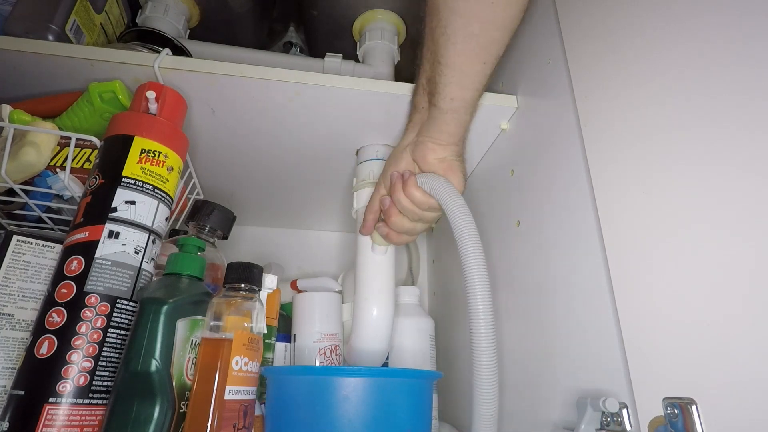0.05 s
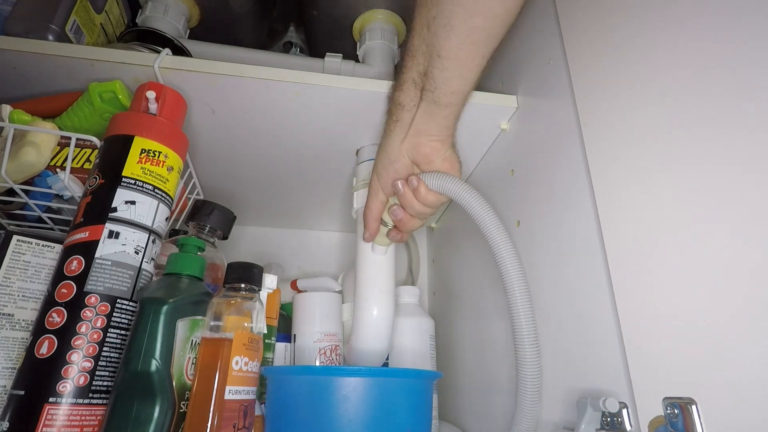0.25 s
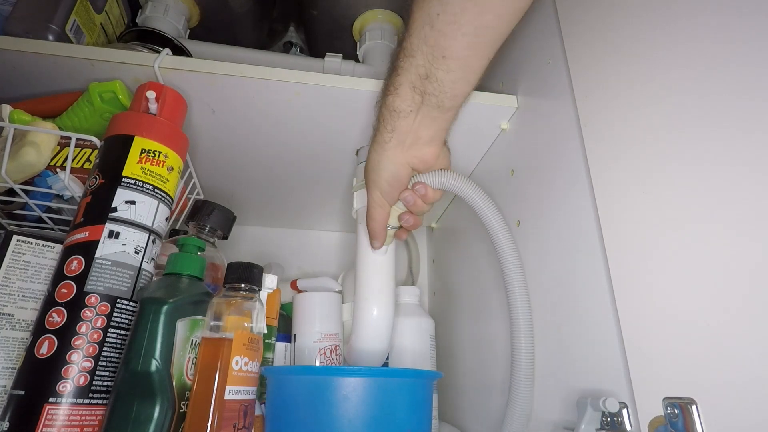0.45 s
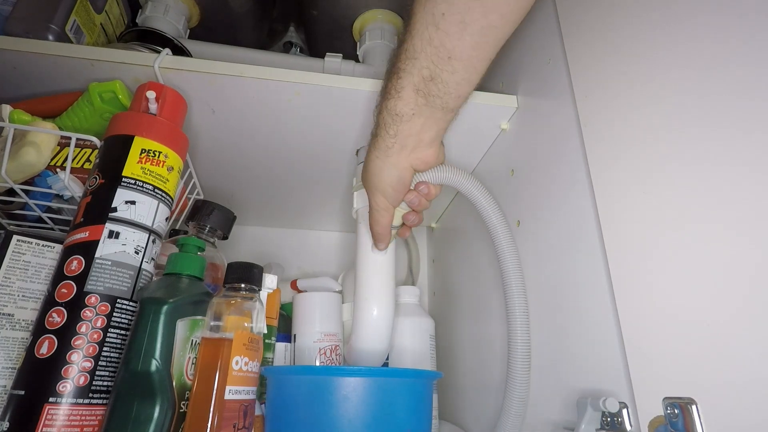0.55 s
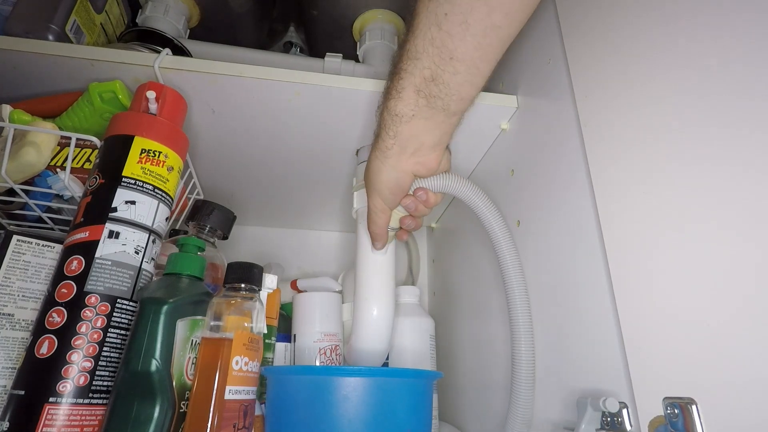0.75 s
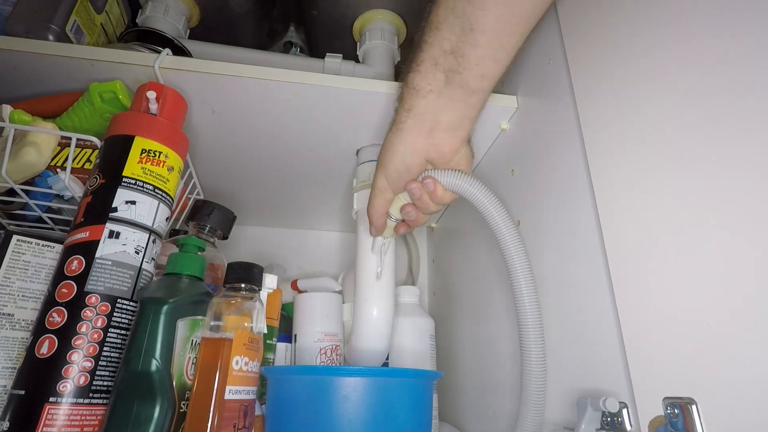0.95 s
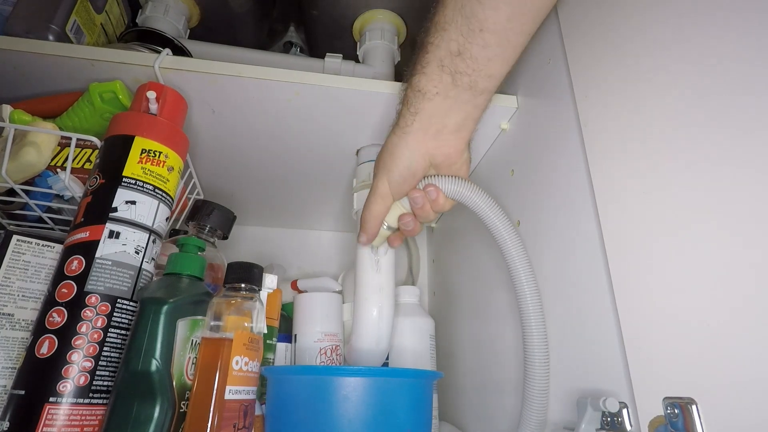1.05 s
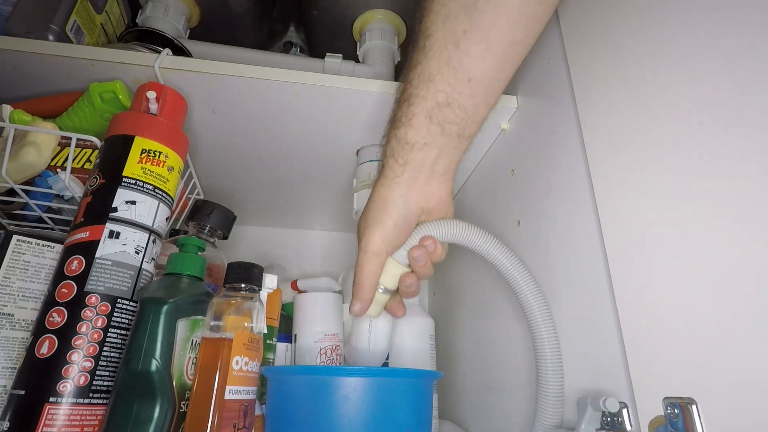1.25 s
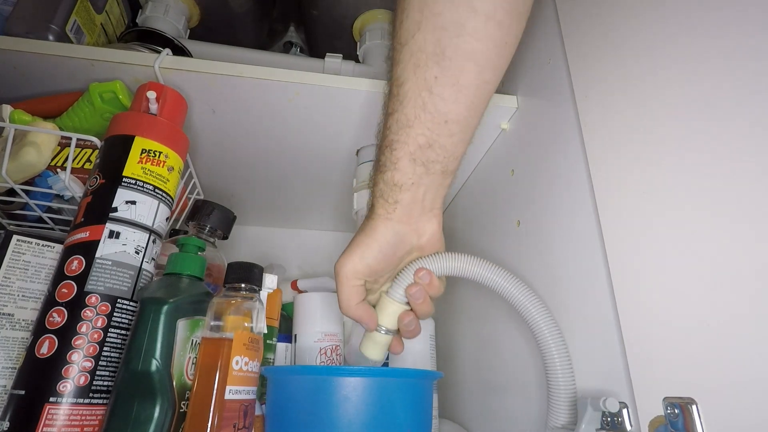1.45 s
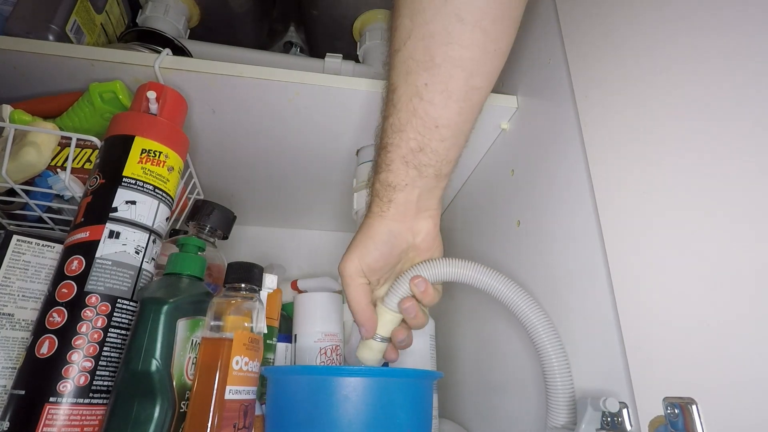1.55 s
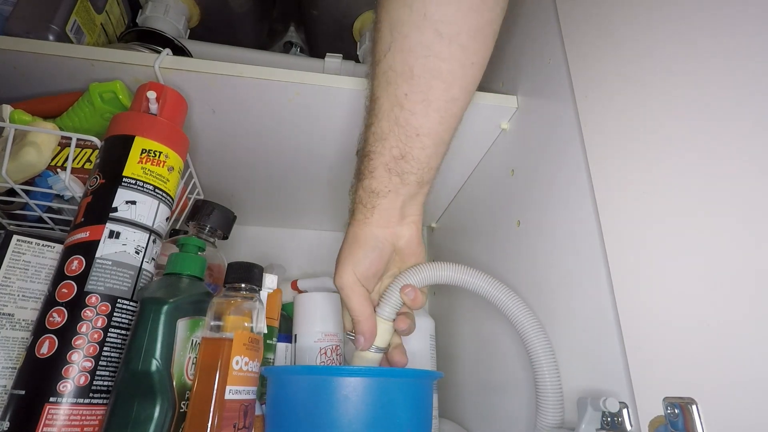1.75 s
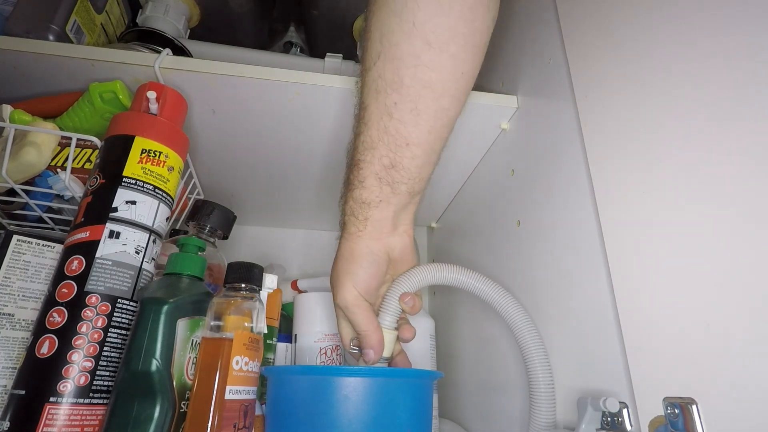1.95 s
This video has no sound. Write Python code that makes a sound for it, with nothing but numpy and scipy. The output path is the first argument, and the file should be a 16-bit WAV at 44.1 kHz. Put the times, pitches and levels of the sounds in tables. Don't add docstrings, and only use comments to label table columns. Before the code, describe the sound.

Hollow plastic pipe knocks sharply, then a ribbed hose thuds free and ticks faintly in a cabinet

```python
import sys
import numpy as np
from scipy import signal
from scipy.fft import rfft, irfft
from scipy.io import wavfile
from scipy.ndimage import uniform_filter1d

SR = 44100
rng = np.random.default_rng(int(sys.argv[2]) if len(sys.argv) > 2 else 0)


def unload_audio(sound):
    columns = np.transpose(np.atleast_2d(sound))
    steps = np.round(np.clip(columns, -1, 1) * 32767)
    wavfile.write(sys.argv[1], SR, steps.astype(np.int16))


def undo_db(level):
    steps = np.asarray(level, float) / 20
    return 10 ** steps


N = 88200

# t/s, crack level/dB, pipe level/dB, cabinet boom level/dB, dullness/(dB per octave)
KNOCKS = [(0.2152,-59.5,-36,-60.5,3), (0.2209,-21.5,-15,-32,11), (0.2221,-10,-5.5,-25,-3.5),
          (0.2655,-26,-18.5,-32,1.5), (0.287,-55,-38,-57,-3), (0.33,-39.5,-33.5,-38,5),
          (0.345,-26.5,-26.5,-41,2.5), (0.351,-31,-26,-53,25), (0.9823,-23.5,-15.5,-34.5,2.5),
          (0.9848,-25.5,-12,-34.5,12), (0.9982,-39,-22.5,-40.5,12), (1.0025,-59,-26,-43.5,3)]
# f/Hz, level/dB, T60/s
PIPE_MODES = [(337, -18, 0.2), (448.2, 1, 0.11), (560, -18, .05), (644, 3.5, 0.062), (821, -1.5, 0.13),
              (916, -2.5, 0.08), (1003, -8, 0.12), (1080, -16, 0.069), (1202, -21.5, 0.15),
              (1406, -23, 0.036)]
WALL_MODES = [(2245, -24, .03), (2785, -10, .022), (3155, -18, .03), (3400, -20, .03), (3755, -11, .022),
              (7200, -17, .02)]
# f/Hz, level/dB, T60/s
BARE_PIPE_MODES = [(346, -12, 0.048), (434, -8, 0.091), (623, -10.5, 0.24), (649.5, 3, 0.063),
                   (746.5, -14.5, 0.13), (824, -10.5, 0.068), (1016, -10, 0.072), (1060, -24, 0.094),
                   (1210, -44, 0.057)]
BARE_WALL_MODES = [(1940, -17, .04), (2110, -13, .045), (2560, -15, .04), (2660, -13, .04),
                   (3133, -15, .045), (3435, -13, .04), (3914, -20, .04), (7000, -19, .025)]
# f/Hz, level/dB, T60/s
CABINET_MODES = [(62.6, -12, 0.94), (80, 1.5, 0.23), (99.2, -6.5, 0.45), (121.5, -13.5, 0.067),
                 (177, 4, 0.14), (173, -0.5, 0.079), (286, -10.5, 0.21)]
# f/Hz, level/dB
CRACK_SPECTRUM = [(1200, -29.5), (1700, -27), (2100, -12.5), (2750, -3), (3750, -3), (4900, -10),
                  (7200, -2), (10000, -11), (15500, -25)]
# t/s, level/dB
BUMPS = [
    (0.6062, -37),
    (0.612, -40.5),
    (0.621, -45.5),
    (0.633, -50.5),
    (0.8188, -45.5),
    (0.831, -47),
]
# f/Hz, level/dB, T60/s
BUMP_MODES = [(70, -4.5, 0.2), (124, -0.5, 0.086), (176.7, -8.5, 0.18), (291, -5, 0.041),
              (507, -4.5, 0.036), (567, 4, 0.036), (800, -6, 0.046), (964, -9, 0.03), (1172, -20.5, 0.06),
              (1440, -26, 0.04), (2060, -51, .04)]
# t/s, peak level/dB, scuff level/dB
SHOVES = [
    (0.872,-31.5,-42),
    (0.879,-20.5,-41.5),
    (0.8855,-18,-29.5),
    (0.8914,-9.5,-28.5),
    (0.8962,-12.5,-66),
    (0.9011,-14.5,-41.5),
    (0.916,-19.5,-38),
    (0.931,-21,-40.5),
    (0.943,-26,-51),
    (0.958,-34,-80),
]
# f/Hz, level/dB, T60/s
SPIGOT_MODES = [(255, -14, .05), (340, -8, 0.07), (474, 2, 0.07), (576, -14, 0.037), (721, -3, 0.04),
                (852, -10, 0.032), (1005, -22, 0.04), (1230, -26, 0.06)]
# f/Hz, level/dB
SCUFF_SPECTRUM = [(150,-7), (450,5.5), (1000,-4), (2310,-17), (2780,-12), (3800,-16.5), (7980,-25),
                  (12800,-28), (16000,-66)]
# t/s, level/dB
THUDS = [
    (0.8843, -14.5),
    (0.894, -16),
    (0.945, -36),
    (0.995, -38),
]
# f/Hz, level/dB, T60/s
THUD_MODES = [(55.2, -25, .5), (66.1, -21, 0.35), (101, 2, 0.13), (126, -25, 0.12), (184, -15, 0.18)]
# t/s, click level/dB, click f/Hz, hollow level/dB
TICKS = [(0.456,-53.5,8000,-72.5), (1.1066,-49,7950,-51), (1.1075,-54.5,4230,-42),
         (1.1224,-57.5,3540,-39.5), (1.126,-54.5,6840,-51), (1.1457,-59.5,3300,-70), (1.1465,-55,10000,-81),
         (1.159,-56,4500,-64), (1.1682,-46.5,10200,-46), (1.169,-50,6900,-49), (1.186,-51.5,3900,-44),
         (1.190,-56,2760,-63), (1.193,-56,10000,-72), (1.201,-67,4400,-71), (1.217,-60,8800,-58),
         (1.2205,-51.5,7050,-42), (1.228,-57.5,6800,-68), (1.249,-62,7300,-57.5), (1.263,-60.5,4030,-70),
         (1.278,-58.5,4080,-69.5), (1.2815,-65,10200,-70), (1.3168,-49,3960,-63), (1.324,-58,8200,-66),
         (1.3314,-52,4070,-52), (1.340,-55.5,3240,-51), (1.349,-65,4900,-50), (1.5998,-61,7200,-59),
         (1.638,-54,4450,-31.5), (1.650,-58.5,4000,-51), (1.673,-60,3000,-45), (1.687,-61.5,3860,-43),
         (1.699,-57,3900,-41), (1.715,-59,3400,-62), (1.727,-65,8300,-63), (1.7405,-59.5,2270,-43),
         (1.7415,-71,8450,-75), (1.764,-62,11300,-71), (1.786,-62,4970,-76), (1.803,-55.5,11500,-72),
         (1.8109,-49.5,9000,-71), (1.815,-57,4200,-46), (1.891,-59,4650,-44), (1.901,-51.5,3970,-41),
         (1.927,-52,4400,-54), (1.9326,-43.5,4720,-62), (1.939,-62,4460,-65), (1.9565,-51,2730,-48),
         (1.974,-48.5,2600,-43), (1.983,-47.5,2900,-50), (1.9835,-59,8500,-73)]
# f/Hz, level/dB, T60/s
HOSE_MODES = [(680, -17, 0.016), (774, 4, 0.027), (857, -4.5, 0.035), (1003, -2.5, 0.029),
              (1310, -8.5, 0.032), (1560, -38, 0.01)]
# f/Hz, level/dB
RUSTLE_SPECTRUM = [(1200, -10), (2600, -2), (4200, -5), (5600, -11), (7300, -4), (10100, -10),
                   (13000, -8.5), (16000, -30)]
TRIM_DB = {"crack": 0.5, "pipe": -4, "cabinet": 0.5, "shove": -5, "scuff": 7, "tick": -3.5, "hose": 2}
# t/s, hiss level/dB, hollow scrape level/dB
RUB = [(0,-64,-61), (0.063,-76,-79.5), (.17,-75.5,-66.5), (0.298,-74.5,-63.5), (.5,-76,-84),
       (.6,-88.5,-71.5), (.74,-84,-101), (.8,-71.5,-72), (0.851,-72.5,-67), (0.893,-54,-35.5),
       (1.049,-78,-62), (1.33,-68.5,-62.5), (1.44,-77,-72), (1.5,-93,-87.5), (1.61,-77,-63),
       (1.645,-74.5,-56), (1.87,-73,-65.5), (2,-63,-60)]
# f/Hz, level/dB
SKIN_SPECTRUM = [(1500, -14.5), (2200, -6), (3000, -9), (4000, -2.5), (5000, -7.5), (7200, -3), (9200, -6),
                 (14000, -19.5)]
SCRAPE_SPECTRUM = [(250, -28), (450, -5.5), (700, -0.5), (1000, -3.5), (1350, -12), (1700, -20)]
# t/s, level/dB
SWISH = [
    (1.49, -100),
    (1.55, -78.5),
    (1.6, -66),
    (1.624, -70),
    (1.645, -96),
]
# f/Hz, level/dB
SLEEVE_SPECTRUM = [(2900, -30), (3600, -8), (4400, -2), (5200, -25.5), (6600, 0), (9000, -1.5),
                   (9800, -32.5)]
# f/Hz, level/dB
BACKGROUND_SPECTRUM = [(25,-6.5), (55,-1.5), (90,-8), (384,-24.5), (734,-20), (1000,-42.5), (2500,-60.5),
                       (8000,-45.5),
                       (10000, -54), (16000, -60)]
# f/Hz, level/dB
ECHO_SPECTRUM = [(60, -6), (300, 0), (650, -5), (1100, 0), (4000, -3), (16000, -14)]


def coloured(points, size):
    hz, db = np.array(points, float).T
    f = np.fft.rfftfreq(size, 1 / SR) + 1
    weight = undo_db(np.interp(np.log(f), np.log(hz), db))
    x = irfft(rfft(rng.standard_normal(size)) * weight, size)
    return x / x.std()


def fade(t, t60, rise):
    return (1 - np.exp(-t / rise)) * np.exp(-np.log(1000) * t / t60)


def ring(modes, t, push):
    scatter_db, detune = 1.2, 0.005
    hz, db, t60 = np.array(modes, float).T[:, :, None]
    level_chance, pitch_chance = rng.standard_normal((2, len(hz), 1))
    level = undo_db(db + scatter_db * level_chance)
    sine = np.sin(2 * np.pi * hz * (1 + detune * pitch_chance) * t)
    envelope = fade(t, t60, push) * (1 - np.exp(-t / push))
    return (level * sine * envelope).sum(axis=0)


def add(out, s, x):
    i = int(s * SR)
    out[i:i + len(x)] += x[:N - i]


def walk(rate):
    k = int(SR / rate)
    x = uniform_filter1d(uniform_filter1d(rng.standard_normal(N), k), k)
    return x / x.std()


def knocks():
    out, t = np.zeros(N), np.arange(SR // 2) / SR
    hose_off_s = 0.9
    grip_s, grip_close_s, grip_db = 0.0099, 0.0008, -8
    grip = undo_db(grip_db / (1 + np.exp(np.clip((grip_s - t) / grip_close_s, -50, 50))))
    rattle = undo_db(-4.5) * fade(t, t60=0.055, rise=0.0053)
    shape = fade(t, t60=0.0092, rise=0.00005) + rattle
    push_s, softer_s_per_db = 0.00028, 0.00003
    for s, db, pipe_db, boom_db, dull_db in KNOCKS:
        if s < hose_off_s:
            pipe_modes, wall_modes = PIPE_MODES, WALL_MODES
        else:
            pipe_modes, wall_modes = BARE_PIPE_MODES, BARE_WALL_MODES
        colour = [(hz, level - dull_db * np.log2(hz / 3000)) for hz, level in CRACK_SPECTRUM]
        crack = undo_db(db + TRIM_DB["crack"] - 6.5) * shape * coloured(colour, len(t))
        pipe_push = push_s + softer_s_per_db * max(0.5 - pipe_db, 0)
        pipe = undo_db(pipe_db + TRIM_DB["pipe"]) * grip * ring(pipe_modes, t, pipe_push)
        wall = undo_db(db) * ring(wall_modes, t, push_s)
        boom = undo_db(boom_db + TRIM_DB["cabinet"]) * ring(CABINET_MODES, t, push=0.0073)
        add(out, s, crack + pipe + wall + boom)
    return out


def shoves():
    out, t = np.zeros(N), np.arange(SR // 2) / SR
    for s, db, scuff_db in SHOVES:
        blow = undo_db(db + TRIM_DB["shove"]) * ring(SPIGOT_MODES, t, push=0.00058)
        scuff = fade(t, t60=0.06, rise=0.0032) * coloured(SCUFF_SPECTRUM, len(t))
        add(out, s, blow + undo_db(scuff_db + TRIM_DB["scuff"]) * scuff)
    for s, db in THUDS:
        add(out, s, undo_db(db) * ring(THUD_MODES, t, push=0.00046))
    return out


def bumps():
    out, t = np.zeros(N), np.arange(SR // 2) / SR
    for s, db in BUMPS:
        add(out, s, undo_db(db) * ring(BUMP_MODES, t, push=0.0026))
    return out


def ticks():
    out, t = np.zeros(N), np.arange(SR // 10) / SR
    grain = undo_db(2.7 * walk(520))
    ring_t60_s, ring_db = 0.009, -2
    skirt = 2 ** (2 * 0.75)
    crumble = 1 - np.exp(-t / 0.004)
    crackle_fade = fade(t, t60=0.046, rise=0.00062)
    for s, db, hz, hollow_db in TICKS:
        ping_modes = [(hz, ring_db, ring_t60_s), (hz * 0.8, ring_db - 26, ring_t60_s)]
        ping = ring(ping_modes, t, push=0.00019)
        band = coloured([(hz / skirt, -50), (hz, 0), (hz * skirt, -50)], len(t))
        crackle = band + undo_db(-2.5) * coloured(RUSTLE_SPECTRUM, len(t))
        start = int(s * SR * 0.9)
        grains = grain[start:start + len(t)] ** crumble
        click = ping + crackle_fade * crackle * grains
        hollow = ring(HOSE_MODES, t, push=0.0016)
        add(out, s, undo_db(db + TRIM_DB["tick"]) * click + undo_db(hollow_db + TRIM_DB["hose"]) * hollow)
    return out


def rub():
    s, hiss_db, scrape_db = np.array(RUB).T
    t = np.arange(N) / SR
    hiss_level = undo_db(np.interp(t, s, hiss_db) + 2.0 * walk(36) + 0.74 * walk(370))
    hiss = hiss_level * coloured([(300, -62.5)] + SKIN_SPECTRUM, N)
    scrape_level = undo_db(np.interp(t, s, scrape_db) + 4.3 * walk(60))
    scrape = scrape_level * coloured([(60, -61)] + SCRAPE_SPECTRUM + [(4000, -70)], N)
    return hiss + scrape


def sleeve():
    s, db = np.array(SWISH).T
    level = undo_db(np.interp(np.arange(N) / SR, s, db, -140, -140) + 0.84 * walk(60))
    return level * coloured([(500, -61)] + SLEEVE_SPECTRUM + [(16000, -60)], N)


def reverberation(near):
    t = np.arange(int(0.7 * SR)) / SR
    echo = coloured(ECHO_SPECTRUM, len(t)) * fade(t, t60=0.42, rise=0.002)
    echo = undo_db(-19) * echo / np.sqrt(np.sum(echo ** 2))
    return signal.fftconvolve(near, echo)[:N]


def hum():
    fan_hz = 730 + 2 * walk(5.4)
    fan = np.sin(2 * np.pi * np.cumsum(fan_hz) / SR)
    fan_level = undo_db(-65 + 1.2 * walk(8.1))
    return undo_db(-57) * coloured(BACKGROUND_SPECTRUM, N) + fan_level * fan


def scene():
    low_cut = signal.butter(4, 46, "high", fs=SR, output="sos")
    near = signal.sosfilt(low_cut, knocks() + bumps() + shoves() + ticks())
    return (near + reverberation(near) + rub() + sleeve() + hum())[None]


def band_limit(x):
    return signal.sosfilt(signal.butter(12, 16570, fs=SR, output="sos"), x)


def record(dry):
    bass_cut = signal.butter(5, 34, "high", fs=SR, output="sos")
    top_cut = signal.ellip(8, 0.2, 60, 16000, fs=SR, output="sos")
    x = signal.sosfilt(top_cut, signal.sosfilt(bass_cut, dry))
    return band_limit(x)


dry = scene()
out = record(dry)
unload_audio(out)
```